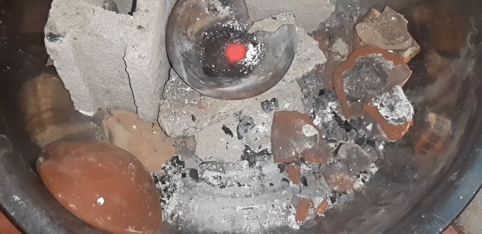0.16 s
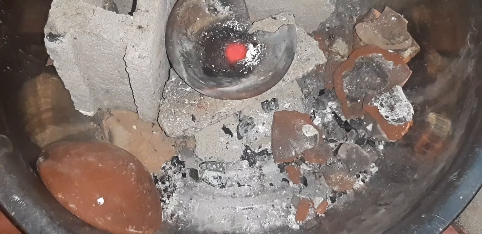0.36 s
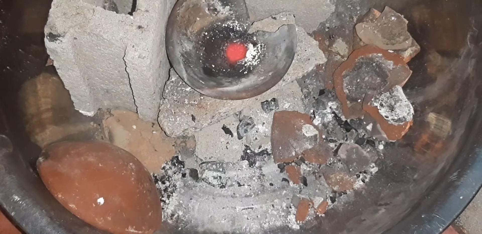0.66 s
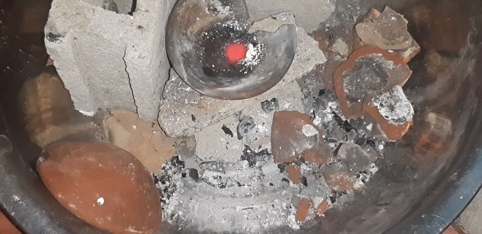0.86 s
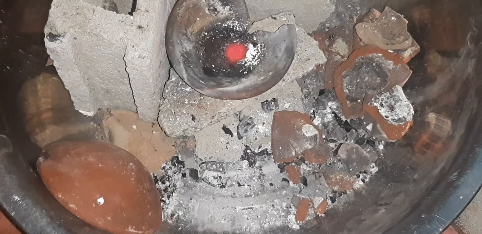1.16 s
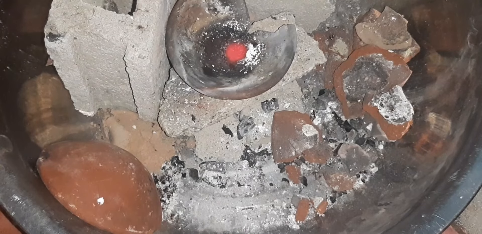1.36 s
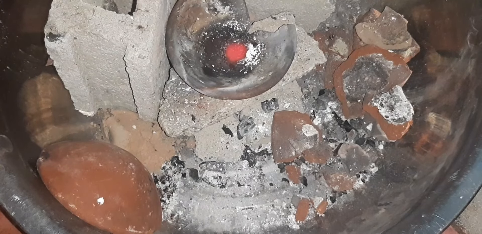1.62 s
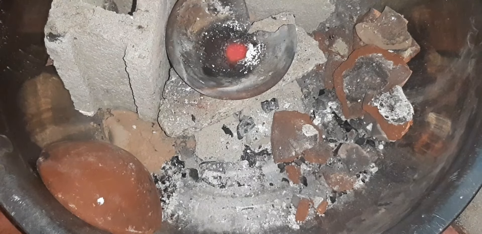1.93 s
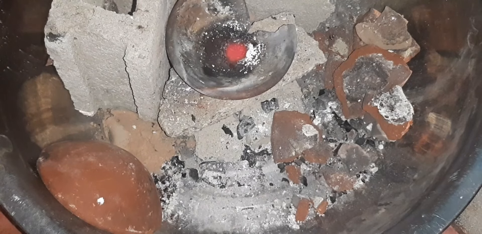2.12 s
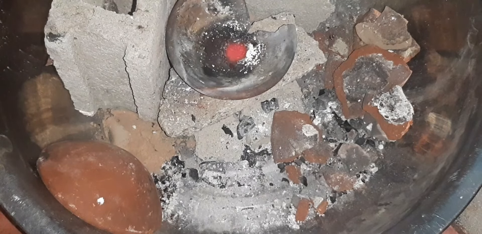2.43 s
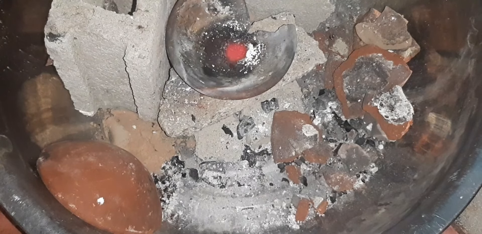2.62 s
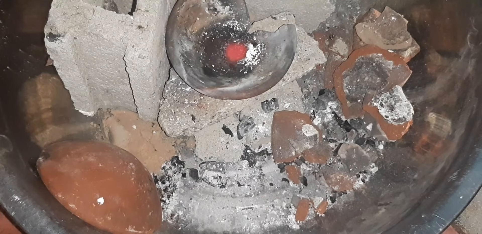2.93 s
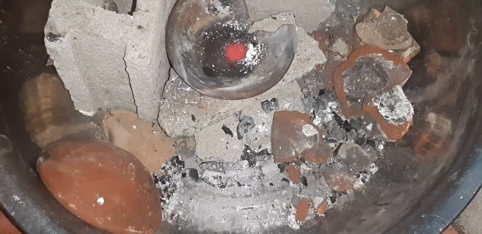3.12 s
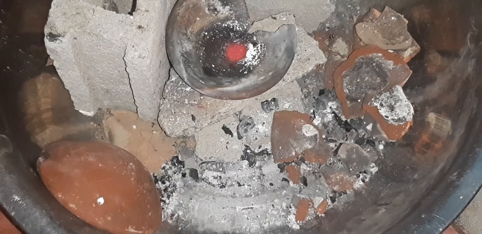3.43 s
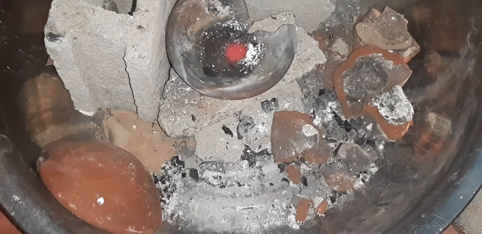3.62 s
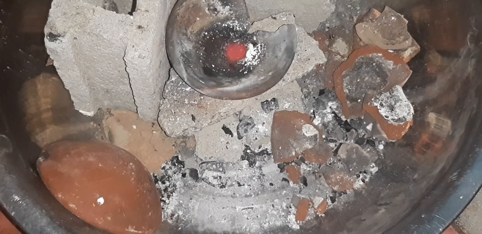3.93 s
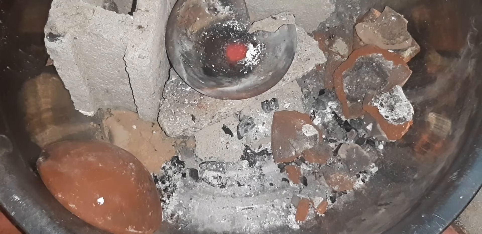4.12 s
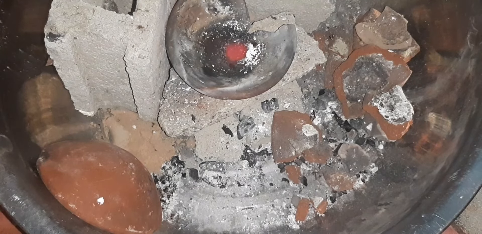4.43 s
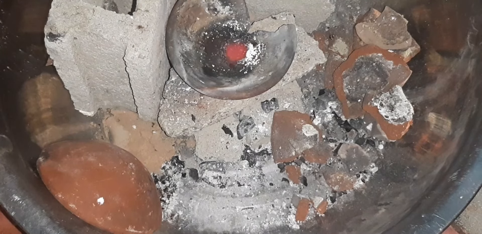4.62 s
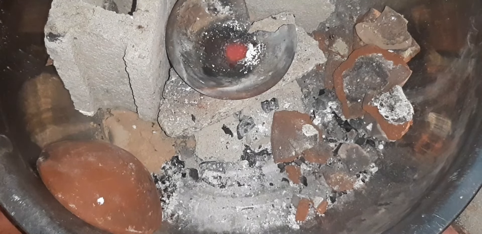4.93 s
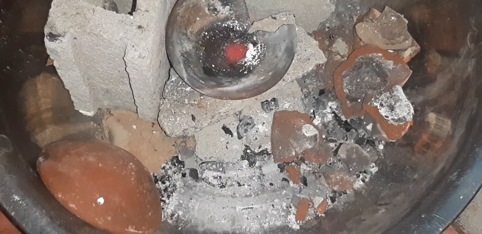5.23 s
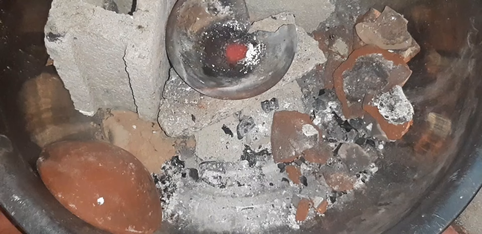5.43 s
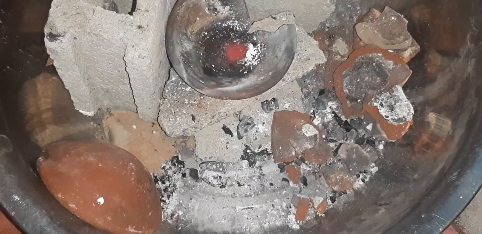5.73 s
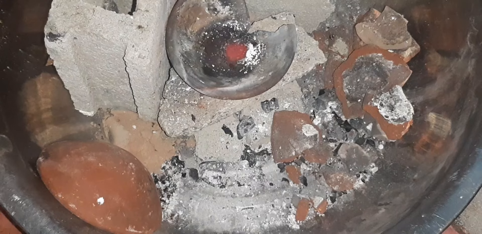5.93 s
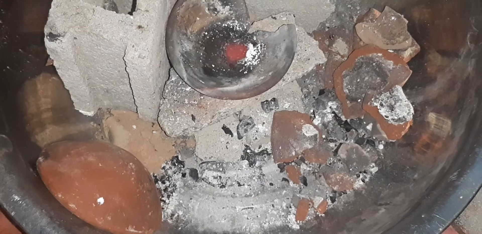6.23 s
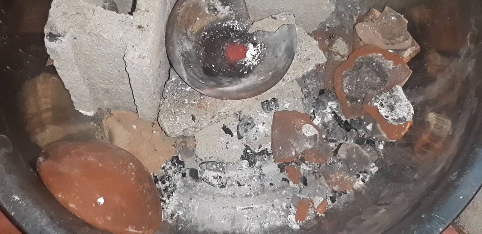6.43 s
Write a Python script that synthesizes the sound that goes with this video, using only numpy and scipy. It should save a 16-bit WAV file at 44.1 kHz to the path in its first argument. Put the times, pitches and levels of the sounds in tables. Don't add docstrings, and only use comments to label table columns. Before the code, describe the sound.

Close up in a small hard-walled room, faint grit shuffling comes before a sudden bright sizzle of hot metal in water. It grows, turns to lower boiling bubbles with sharp snaps, and dies quickly into sparse fizz. Irregular delicate tong clinks, small scrapes and short rings follow, leaning right, with one longer dish ring near the end. Low room hum and faint vehicles lie underneath.

```python
import sys
import numpy as np
from scipy import signal
from scipy.io import wavfile
from scipy.ndimage import uniform_filter1d

SR = 44100
rng = np.random.default_rng(int(sys.argv[2]) if len(sys.argv) > 2 else 0)


def gain_from_decibels(decibels):
    exponent = np.asarray(decibels, float) / 20
    return 10 ** exponent


def file_out(sig):
    cols = np.atleast_2d(sig).T
    lim = np.clip(cols, -1, 1)
    pcm = np.round(lim * 32767).astype(np.int16)
    wavfile.write(sys.argv[1], SR, pcm)


N = 289296

# f/Hz, width/Hz, level/dB
PAN = [(372, 53, -9), (1079, 34, 2), (1303, 39, 4), (1422, 40, 1), (1835, 38, -3.5), (2310, 40, -14),
       (2740, 49, -3.5), (3995, 48, -3.5), (4300, 200, 1), (4670, 40, -9.5)]


def quench():
    # t/s, vigour/dB, bubble size/0-1
    boiling = [
        (0.972, -40.5, 0),
        (1.003, -32.5, 0),
        (1.41, -28, 0.04),
        (1.75, -26.5, 0.05),
        (1.87, -22, 0),
        (1.93, -27.5, 0.52),
        (2.08, -32, 0.81),
        (2.24, -33, 0.34),
        (2.33, -34.5, 0.23),
    ]
    # t/s, vigour/dB, bubble size/0-1
    simmer = [
        (2.33, -28, .2),
        (2.39, -35.5, .15),
        (2.52, -45.5, .1),
        (2.65, -53, -.2),
        (2.85, -59.5, -.8),
        (3.05, -81, -1.2),
        (3.3, -80, -1.2),
    ]
    # f/Hz, level/dB per Hz
    hiss_spectrum = [(900, -37.5), (1500, -26), (2300, -13), (2800, -9), (3300, -5.5), (3700, -9.5),
                     (4050, -1.5), (4650, -1), (5100, -6.5), (6700, -2.5), (7600, -7.5), (9500, -43)]
    boil_spectrum = [(470, -43), (800, -8.5), (1210, 0.5), (1300, -3.5), (1830, -1.5), (2570, -14),
                     (2800, -5.5), (3640, -30), (6160, -120)]
    slosh_spectrum = [(76, -55), (150, -26.5), (220, -9), (280, -14), (330, -15.5), (420, -7.5), (706, -8),
                      (900, -2), (1170, -11.5), (1980, -120)]
    fizz_spectrum = [(7000, -26), (8000, 5), (10800, 1), (13000, 2), (16000, 3), (18000, -6.5)]

    after_boil = np.arange(N) / SR > boiling[-1][0]
    hiss, shake, boil, slosh, fizz = bubble_gains(boiling) + bubble_gains(simmer) * after_boil
    small = evened(colour(grains(per_s=12000, spread_db=-0.6, clump_db=2.5), hiss_spectrum))
    large = grains(per_s=4000, spread_db=2.0, clump_db=2.14)
    base = drive(large, [(hz, db, 2.2 / max(width, 45)) for hz, width, db in PAN if hz < 2500])
    wall = evened(drive(small, [(hz, db, 2.1 / width) for hz, width, db in PAN if hz > 2500]))
    fine = evened(colour(grains(per_s=7700, spread_db=-3.5, clump_db=-2.96), fizz_spectrum))
    low = boil * (evened(colour(large, boil_spectrum)) + 0.44 * base)
    low += slosh * evened(colour(large[::-1], slosh_spectrum))
    return hiss * small + shake * wall + low + fizz * fine


def bubble_gains(rows):
    t = np.arange(N) / SR
    s, vigour_db, size = np.transpose(rows)
    plunge_db_per_s, slosh_lag_s, splash_s = 3014, 0.096, 0.087
    db = np.interp(t, s, vigour_db, right=-150) - plunge_db_per_s * np.maximum(s[0] - t, 0)
    now = np.interp(t, s, size)
    keep = np.exp(-1 / (slosh_lag_s * SR))
    lazy = signal.lfilter([1 - keep], [1, -keep], now)
    splash_db = 11.5 * np.exp(-abs(t - s[0]) / splash_s)
    layers_db = [-5.5 * now,
                 -14 + 13.5 * now,
                 -17 + 24.5 * now,
                 -27 + 28.5 * lazy + splash_db,
                 -4.5 - 8.5 * now]
    return gain_from_decibels(np.maximum(db, -150) + layers_db)


def steam_pops():
    # t/s, peak/dB, low part/dB, high part/dB
    pops = [(0.5035, -43, -2.5, -40), (0.7253, -54.5, -18, -45), (2.1328, -21.5, 0, -12.5),
            (2.3408, -20.5, 4, -18), (2.5269, -29.5, 3.5, -10.5), (2.5345, -51, -8, -18),
            (2.5439, -49, -2, -20), (2.6334, -37, -25, -16), (2.6865, -33.5, 4, -19),
            (2.7858, -41, -8, -12), (2.808, -57, -20, 0), (2.8646, -40, -9, -7.5), (2.878, -50, -22, 2),
            (2.9245, -52, -24, 4.5), (2.703, -52, -10, -11), (2.716, -51, -10, -12), (2.742, -51, -10, -13),
            (2.9472, -40.5, -16, -11), (2.9913, -48.5, -21.5, -2.5), (3.0367, -55, -24, -3),
            (3.0861, -52, -22.5, 0), (3.108, -52.5, -28, 7), (3.153, -52, -27, -8),
            (3.1874, -47, -12, -1.5)]
    return snaps(pops, decay_ms=0.95, low_hz=2750, body_hz=4020, high_hz=9600)


def bubble_bursts():
    # t/s, peak/dB, f/Hz
    bursts = [(2.0695, -22, 4350), (2.132, -23, 4530), (2.34, -14.5, 4290), (2.528, -23, 4360),
              (2.533, -28, 4150), (2.5418, -45, 4100), (2.6862, -28.5, 4300), (2.7849, -38, 6400),
              (2.8635, -31, 6620), (2.9234, -44.5, 7000), (2.9474, -40, 4630), (3.0858, -48, 6120),
              (3.107, -50, 7050), (3.1854, -38.5, 6870)]
    return gain_from_decibels(5) * pings(bursts, ms=0.42)


def tongs():
    # f/Hz, level/dB, t60/s
    low_before = [(2590, -8, .12), (2640, 0, .19), (2665, -9, .4), (2725, -7, .13)]
    low_after = [(2650, -10, .1), (2715, -1, .14), (2750, 0, .12), (2860, -12, .05)]
    mid_modes = [(4510, -5, .11), (4581, 0, .13), (4560, -14, .3), (4645, -5, .09)]
    top_modes = [(4100, -17.5, 0.017), (5860, -15.5, 0.013), (6320, -8.5, 0.018), (6980, 0.5, 0.016),
                 (7130, -5, .015), (7640, -8.5, 0.043), (10760, -15, 0.012), (12540, -9, 0.018)]
    # t/s, length/s, grit/dB, first mode drive/dB, second mode drive/dB
    drags = [(2.345, 0.024, -30, -52, -60), (2.529, 0.015, -47, -30, -60), (2.56, 0.041, -49, -52, -65),
             (3.335, 0.02, -57, -54.5, -58), (3.42, 0.026, -51.5, -43.5, -54),
             (3.464, 0.0068, -66, -68, -49), (3.48, 0.25, -56, -56, -64),
             (3.653, 0.0093, -42, -30.5, -25.5), (3.675, 0.04, -76, -36.5, -46),
             (3.72, 0.054, -71.5, -37.5, -52), (3.78, 0.061, -66, -49.5, -75),
             (4.49, 0.043, -67, -69.5, -72), (4.542, 0.047, -62, -80, -79), (4.6, 0.29, -61, -65, -83),
             (4.677, 0.062, -64, -53, -84), (4.918, 0.081, -54.5, -60, -63), (5.03, 0.054, -55.5, -56, -69),
             (5.162, 0.022, -37.5, -40.5, -32), (5.51, 0.17, -74, -65, -68), (5.765, 0.038, -67, -44, -58),
             (5.81, 0.044, -69, -36, -57), (5.88, 0.051, -62, -53.5, -58), (5.934, 0.1, -63, -42, -44),
             (5.972, 0.067, -72, -36, -34.5), (6.0, 0.032, -68, -30.5, -37), (6.03, 0.021, -42, -31, -45),
             (6.06, 0.048, -60, -70, -68), (6.296, 0.014, -63, -31, -30), (6.322, 0.014, -65, -39, -35),
             (6.335, 0.057, -72, -58, -44), (6.475, 0.091, -79, -68, -80)]
    # t/s, length/s, level/dB
    presses = [(2.529, 0.012, -57), (3.335, 0.03, -66), (3.42, 0.22, -70), (3.65, 0.13, -57),
               (4.68, 0.12, -71.5), (5.11, 0.031, -79.5), (5.765, 0.03, -60), (5.798, 0.017, -55),
               (5.86, 0.047, -62.5), (5.975, 0.035, -72), (6.028, 0.054, -62.5), (6.295, 0.037, -54),
               (6.5, 0.054, -69.5)]
    # t/s, length/s, level/dB
    grinds = [
        (5.97, .03, -40),
        (5.995, 0.029, -43),
        (6.03, 0.021, -68),
        (4.2, .04, -63),
        (6.295, 0.023, -54),
    ]
    # f/Hz, level/dB, t60/s
    hollow = [(440, 5, 0.36), (1058, 17, 0.038), (1700, 6, 0.02), (2260, 9, 0.015)]
    rim = [(2156, -2, 0.021), (2310, -2, .02), (3020, 0, 0.036)]

    s, db, _, high_db, low_mode_db, mid_mode_db = columns = touches()
    noise = snaps(columns.T, decay_ms=0.89, low_hz=1430, body_hz=4630, high_hz=9070)
    noise += strike(s, db + 0.063 * high_db + 9.5, ring(top_modes))
    slips = grains(per_s=5400, spread_db=1.3, clump_db=-2.5)
    grit, low_arm, mid_arm = strokes(drags)
    knock = strokes(presses)[0]
    noise += grit * (evened(band(slips, 2970, 6900)) + 0.5 * evened(band(slips, 9900, 24000)))
    noise += knock * (drive(slips, hollow) + 1.26 * evened(band(slips, 346, 3400)))
    noise += strokes(grinds)[0] * drive(slips[::-1], rim)

    rings = strike(s, mid_mode_db + 5.5, ring(mid_modes))
    rings += 0.5 * drive(mid_arm * slips, mid_modes)
    rings += 0.3 * mid_arm * evened(band(slips, 3900, 5000))
    rings += 0.33 * low_arm * evened(band(slips, 2080, 3110))
    shift_s = 5.7
    late = np.arange(N) / SR > shift_s
    for modes, ticks, drag in ((low_before, s < shift_s, ~late), (low_after, s > shift_s, late)):
        rings += strike(s[ticks], low_mode_db[ticks] - 3.5, ring(modes))
        rings += 0.5 * drive(drag * low_arm * slips, modes)
    return noise, rings


def touches():
    # t/s, peak/dB, high part/dB, first mode/dB, second mode/dB
    clinks = [(3.3354, -57, -3, -47.5, -60), (3.3521, -62, 4, -52, -57), (3.4169, -54, -7, -40.5, -70),
              (3.431, -48, -19, -44.5, -46), (3.462, -41.5, -3.5, -52, -40), (3.652, -42, -8, -31, -49),
              (4.104, -35.5, 1, -45, -38), (4.3277, -37.5, -0.5, -53, -61), (4.6737, -39, -6, -67, -60),
              (4.9157, -40.5, -7, -65, -51.5), (4.959, -40.5, -0.5, -52, -68),
              (5.0481, -47.5, -0.5, -53, -70), (5.1274, -23.5, -16, -33, -37),
              (5.1603, -20.5, -9, -23.5, -19.5), (5.1712, -45, -14, -35, -29), (5.184, -43, -13, -29, -32),
              (5.3976, -39, -2, -53.5, -47), (5.758, -61, -17.5, -49, -65), (5.773, -54, -11, -42, -58),
              (5.799, -62, -10, -39, -62), (5.8199, -59, -18, -38.5, -61), (5.934, -29, -11, -57, -37.5),
              (6.0215, -37.5, 5, -38, -41), (6.036, -56, -7, -34.5, -64), (6.051, -63, -7, -32, -64),
              (6.289, -40, -11.5, -29.5, -38), (6.2936, -54, 3, -24.5, -54), (6.303, -61, 0, -27.5, -63),
              (6.313, -63, -2, -39, -43), (6.3208, -57, 5, -37, -36), (6.3943, -66, -8, -52.5, -50),
              (6.4788, -72, -16, -46.5, -56), (6.533, -65.5, 1, -45.5, -66)]
    # t/s, peak/dB
    tip_ticks = [
        (3.326, -54.5),
        (3.5643, -48),
        (3.6038, -46.5),
        (3.7718, -41),
        (4.2764, -53.5),
        (4.519, -63.5),
        (4.537, -50),
        (5.0265, -62.5),
        (5.8794, -47.5),
        (6.1517, -53.5),
    ]
    # t/s, peak/dB
    bumps = [
        (3.3344, -50.5),
        (3.6497, -42),
        (5.05, -47),
        (5.7664, -44),
        (5.8004, -51),
        (5.8193, -45),
        (5.8796, -35.5),
        (6.288, -47),
        (6.2938, -38),
    ]
    low_db, tip_body_db, tip_ring_db, off = -24.5, -6, -18, -120
    rows = [(s, db, low_db, *rest) for s, db, *rest in clinks]
    rows += [(s, db + tip_body_db, low_db, -tip_body_db, db + tip_ring_db, off) for s, db in tip_ticks]
    rows += [(s + 1 / SR, off, db - off, 0, off, off) for s, db in bumps]
    return np.transpose(rows)


def grit_skips():
    # t/s, peak/dB, f/Hz
    skips = [(3.343, -41, 4020), (3.463, -28, 4620), (3.65, -40, 4600), (3.6654, -38, 4520),
             (3.6887, -46, 4560), (4.5365, -45.5, 6940), (4.6728, -51, 6940), (4.692, -48, 7240),
             (4.9142, -38, 6330), (4.9424, -40.5, 3800), (4.9592, -37, 7010), (4.9705, -42, 6860),
             (5.0287, -38, 3700), (5.0495, -55, 4600), (5.1264, -23, 6830), (5.9315, -24.5, 7400)]
    return gain_from_decibels(2) * pings(skips, ms=0.5)


def dish():
    # t/s, long mode/dB, short modes/dB, t60 of long mode/s
    blows = [
        (2.72, -70, -87, 0.79),
        (2.82, -65.5, -77, 1.6),
        (3.338, -64, -80, 1.8),
        (3.522, -62.5, -66, 0.85),
        (3.661, -78, -77, 0.86),
        (3.76, -57, -73.5, 1.07),
        (5.779, -60, -81, 1),
        (6.03, -91, -62, .4),
        (6.291, -45.5, -48.5, 15),
        (6.477, -86, -60, .5),
    ]
    # f/Hz, level/dB, t60/s
    short_modes = [(1006, 6.5, 0.15), (1109, 12, 0.098), (892, -1, 0.29), (2110, -27, 0.073),
                   (4120, 0, .06)]
    s, _, short_db, _ = np.transpose(blows)
    hum = sum(strike(np.array([t]), db, ring([(955, 0, t60)])) for t, db, _, t60 in blows)
    return hum + strike(s, short_db, ring(short_modes))


def shuffle():
    # t/s, length/s, effort/dB, weight/dB
    shuffles = [
        (0.008, 0.016, -54, 11),
        (0.11, 0.034, -54, -19),
        (0.138, 0.04, -54.5, -17),
        (0.223, .04, -54.5, -14),
        (0.277, 0.023, -47.5, -23),
        (0.478, 0.032, -54.5, -41),
        (0.502, 0.019, -48.5, -39),
        (0.72, 0.042, -80, -4),
    ]
    # f/Hz, level/dB per Hz
    grit_spectrum = [(1180, -29), (2000, -18.5), (2610, -14.5), (3890, -4), (5670, -7), (6280, -4.5),
                     (8500, -23.5), (11000, -37), (18700, -120)]
    rows = [(s, length, db, db + weight) for s, length, db, weight in shuffles]
    body, low = strokes(rows, rise_db_per_s=1502)
    edge = gain_from_decibels(-15.5) * body
    grit = grains(per_s=9000, spread_db=2.5, clump_db=1)
    out = body * evened(colour(grit, grit_spectrum))
    out += low * evened(band(grit, 980, 4040))
    return out + edge * evened(band(grit, 7800, 25000))


def room(x):
    # f/Hz, t60/s
    decay = [(300, 0.47), (1300, 0.38), (3500, 0.34), (9000, 0.32), (16000, 0.24)]
    out = np.zeros((2, N))
    phase = 2 * np.pi * np.arange(N) / SR * 2.3
    for k in range(3):
        taps = np.zeros((2, SR // 2))
        slots = np.arange(50, SR // 2 - 10, 10)
        at = slots + rng.integers(0, 10, (2, len(slots)))
        np.put_along_axis(taps, at, rng.choice([-1., 1.], at.shape), 1)
        hz, t, z = signal.stft(taps, SR, nperseg=128)
        near = 1 + 0.51 * np.exp(-t / 0.055)
        gap = 1 - 0.72 * np.exp(-(t / 0.0043) ** 2)
        fall = gain_from_decibels(-60 * t / read(decay, hz)[:, None])
        tail = signal.istft(z * (near * gap * fall), SR, nperseg=128)[1]
        share = np.sqrt(2 / 3) * np.cos(phase + k * np.pi / 3)
        out += signal.oaconvolve((share * x)[None], tail / np.linalg.norm(tail[0]), axes=1)[:, :N]
    return out


def floor():
    # f/Hz, level/dB per Hz
    spectrum = [(12, -28), (20, -4.5), (60, -7), (110, -4), (145, -12), (189, -11.5), (218, -22),
                (265, -15), (583, -20.5), (1180, -26.5), (2000, -30.5), (4500, -27.5), (9410, -31),
                (15200, -24.5), (16500, -57)]
    # f/Hz, left-right likeness
    likeness = [(30, 0.93), (80, 0.7), (150, 0.53), (300, 0.59), (1000, 0.05), (15000, 0.18)]
    # t at nearest/s, level/dB, half width/s
    passes = [
        (0.0, -67, 0.16),
        (2.45, -71.5, 0.076),
        (3.702, -74, 0.09),
        (4.98, -66, .3),
        (6.6, -67, 0.16),
    ]
    frames, hz = N // 256 + 5, np.fft.rfftfreq(1024, 1 / SR)
    a, b, c, d = rng.standard_normal((frames, 513, 4)).T
    same = np.clip(read(likeness, hz), -1, 1)[:, None]
    left = a + 1j * b
    right = same * left + np.sqrt(1 - same ** 2) * (c + 1j * d)
    noise = signal.istft(np.array([left, right]), nperseg=1024, noverlap=768)[1][:, :N]
    t = np.arange(N) / SR
    near = gain_from_decibels(-82) + sum(gain_from_decibels(db) / (1 + ((t - s) / half) ** 2) for s, db, half in passes)
    traffic = near * evened(band(noise[:, ::-1], 230, 890))
    swell = evened(uniform_filter1d(uniform_filter1d(rng.standard_normal(N), 9000), 9000))
    return gain_from_decibels(-71.5 + swell) * evened(colour(noise, spectrum)) + gain_from_decibels(-4.5) * traffic


def evened(x):
    return x / np.sqrt(np.mean(x ** 2) + 1e-20)


def read(points, hz):
    f, value = np.transpose(points)
    return np.interp(np.log(hz + 1), np.log(f + 1), value)


def colour(x, points):
    gain_db = np.maximum(read(points, abs(np.fft.fftfreq(4096, 1 / SR))), -100)
    log_gain = gain_db * np.log(10) / 20
    taps = np.fft.ifft(np.exp(np.conj(signal.hilbert(log_gain)))).real[:2048]
    return signal.oaconvolve(x, taps.reshape((1,) * (x.ndim - 1) + (-1,)), axes=-1)[..., :N]


def band(x, lo_hz, hi_hz):
    sos = signal.butter(3, [lo_hz, min(hi_hz, 0.45 * SR)], "band", fs=SR, output="sos")
    return signal.sosfilt(sos, x)


def grains(per_s, spread_db, clump_db):
    size = gain_from_decibels(spread_db * np.minimum(rng.exponential(1, N), 5)) * rng.standard_normal(N)
    clumps = evened(uniform_filter1d(uniform_filter1d(rng.standard_normal(N), 700), 700))
    return evened(size * (rng.random(N) < per_s / SR) * gain_from_decibels(clump_db * clumps))


def ring(modes):
    t = np.arange(0, max(t60 for _, _, t60 in modes), 1 / SR)
    tones = sum(gain_from_decibels(db - 60 * t / t60) * np.sin(2 * np.pi * hz * t) for hz, db, t60 in modes)
    return np.minimum(t / 0.002, 1) * tones


def strike(times, dbs, response):
    blows = np.zeros(N)
    blows[np.minimum(np.round(times * SR).astype(int), N - 1)] = gain_from_decibels(dbs)
    return signal.oaconvolve(blows, response)[:N]


def drive(x, modes):
    response = ring(modes)
    return signal.oaconvolve(x, response / np.linalg.norm(response))[:N]


def snaps(rows, decay_ms, low_hz, body_hz, high_hz):
    s, db, low_db, high_db = np.transpose(rows)[:4]
    out = np.zeros(N)
    t_ms = np.arange(900) / SR * 1000
    noise = rng.choice([-1., 1.], N)
    for level_db, lo_hz, hi_hz, ms in ((db + low_db, low_hz, 1.62 * low_hz, decay_ms),
                                       (db, body_hz, 7800, decay_ms),
                                       (db + high_db - 0.5, high_hz, 18000, 2.2 * decay_ms)):
        burst = 0.46 * np.exp(-t_ms / ms) + 0.044 * np.exp(-t_ms / 6)
        out += band(noise * strike(s, level_db, burst), lo_hz, hi_hz)
    return gain_from_decibels(17.5) * out


def strokes(rows, rise_db_per_s=4000):
    sag_db, fall_db_per_s = -8.5, 508
    out = np.zeros((len(rows[0]) - 2, N))
    for start, length, *dbs in rows:
        first = max(round((start - 0.1) * SR), 0)
        t = np.arange(first, min(round((start + length + 0.3) * SR), N)) / SR - start
        shape_db = (rise_db_per_s * np.minimum(t, 0) + sag_db * np.clip(t / length, 0, 1)
                    - fall_db_per_s * np.maximum(t - length, 0))
        out[:, first:first + len(t)] += gain_from_decibels(np.array(dbs)[:, None] + shape_db)
    return out


def pings(rows, ms):
    out = np.zeros(N + SR)
    u = np.arange(400) / SR * 1000 / ms
    lag_s = 0.0006
    for s, db, hz in rows:
        ping = gain_from_decibels(db) * u * np.exp(1 - u) * np.sin(2 * np.pi * hz * u * ms / 1000)
        out[round((s + lag_s) * SR):][:len(u)] += ping
    return out[:N]


def scene():
    # f/Hz, level/dB
    treble_dip = [(6500, -4), (7700, -9), (8100, -11.5), (8700, -10), (9300, -6.5), (10500, -3), (13000, 0)]
    left_shading = [(100, 0), (300, -1), (600, 0), (1100, -4), (3000, -3), (12000, -4)]
    steady = quench() + shuffle()
    noise, rings = tongs()
    pops = steam_pops()
    rings = rings + dish()
    bursts, skips = bubble_bursts(), grit_skips()
    steady += gain_from_decibels(-19) * drive(bursts, [(hz, db, 0.73 / width) for hz, width, db in PAN[-4:]])

    water = gain_from_decibels(-4.5) * steady
    clicks = gain_from_decibels(4.5) * pops + bursts + skips
    steel = gain_from_decibels(-1.5) * noise + rings
    wet = room(gain_from_decibels(2.0) * steady + gain_from_decibels(6.5) * pops + gain_from_decibels(1.5) * noise + 0.5 * rings
               + gain_from_decibels(2) * bursts + gain_from_decibels(-0.5) * skips)
    bass = signal.butter(2, 450, fs=SR, output="sos")
    wet[0] += 0.71 * signal.sosfiltfilt(bass, wet[1] - wet[0])

    far = np.roll(water + gain_from_decibels(-7) * steel + gain_from_decibels(-8) * clicks, 4)
    near = water + steel + clicks
    left, right = colour(np.array([far, near]) + wet, treble_dip)
    return np.array([colour(left, left_shading), right]) * gain_from_decibels(4.5) + floor()


def low_pass(x):
    return signal.sosfilt(signal.butter(12, 16990, fs=SR, output="sos"), x)


def record(dry):
    # f/Hz, level/dB
    edge = [(15700, 0), (16100, -34), (16900, -40), (17200, -90)]
    mix = colour(dry, edge)
    return low_pass(mix)


dry = scene()
out = record(dry)
file_out(out)
```